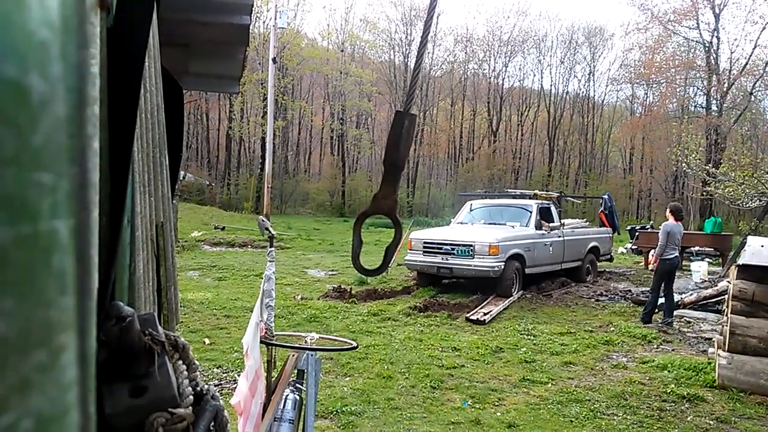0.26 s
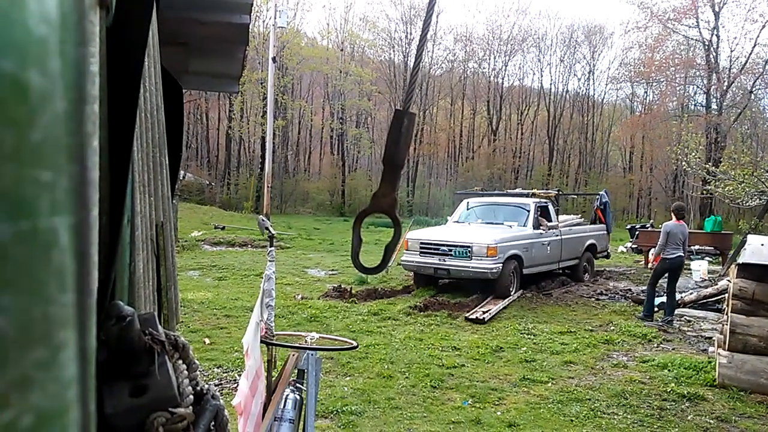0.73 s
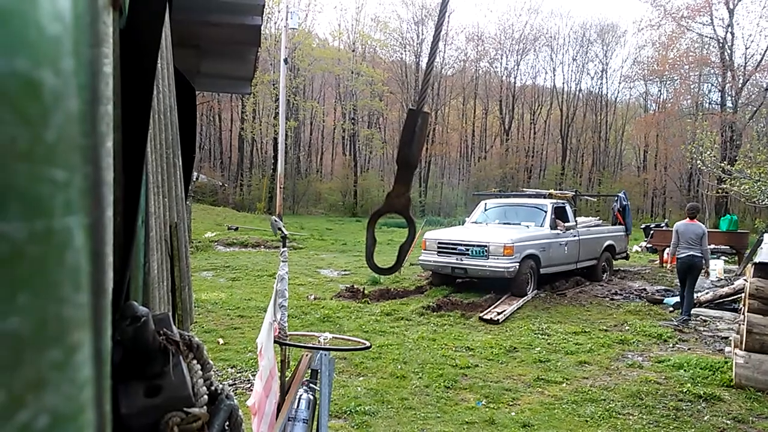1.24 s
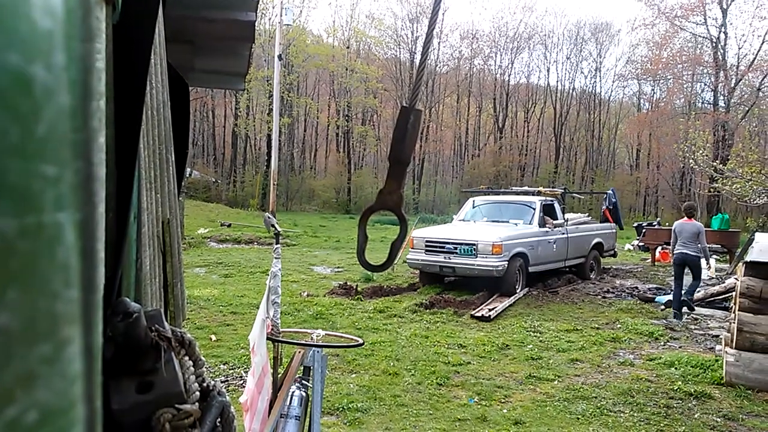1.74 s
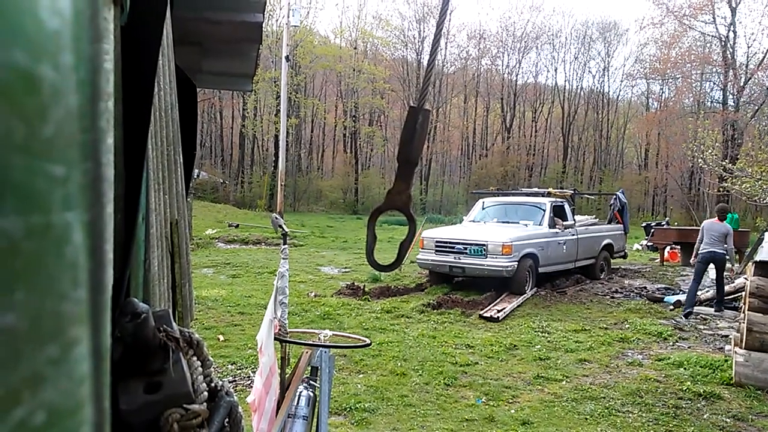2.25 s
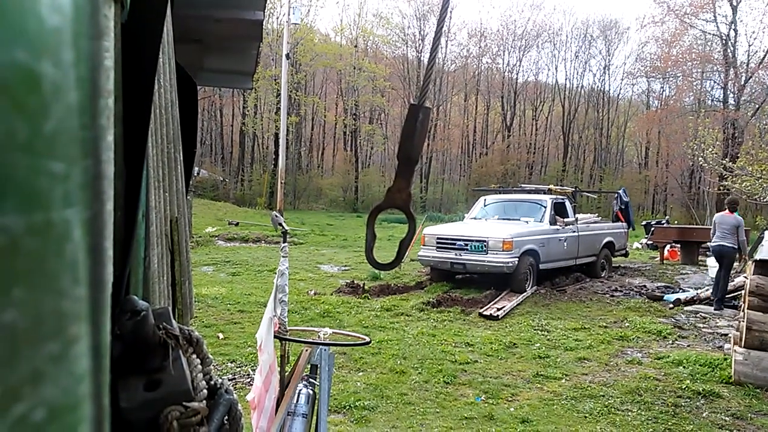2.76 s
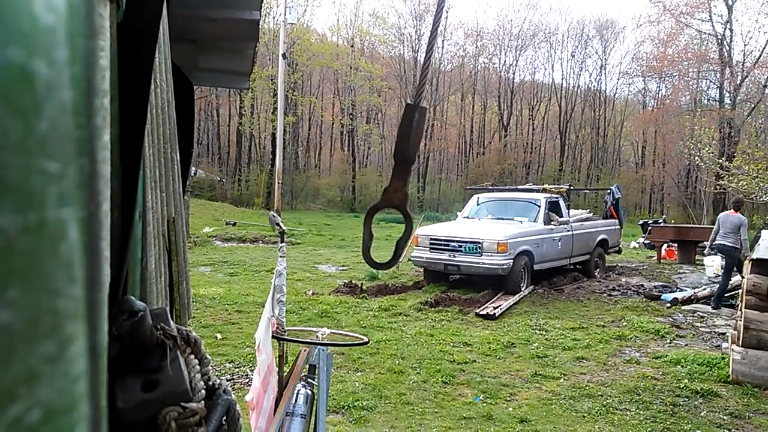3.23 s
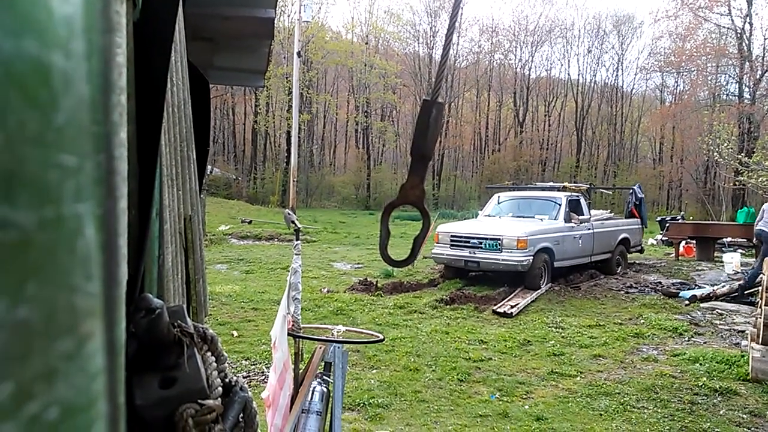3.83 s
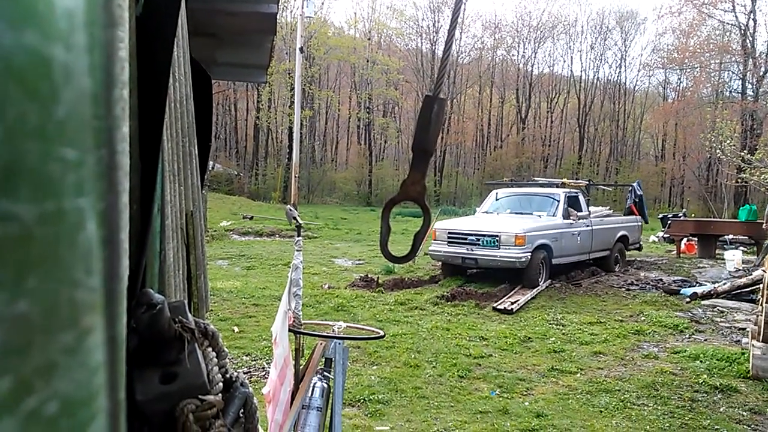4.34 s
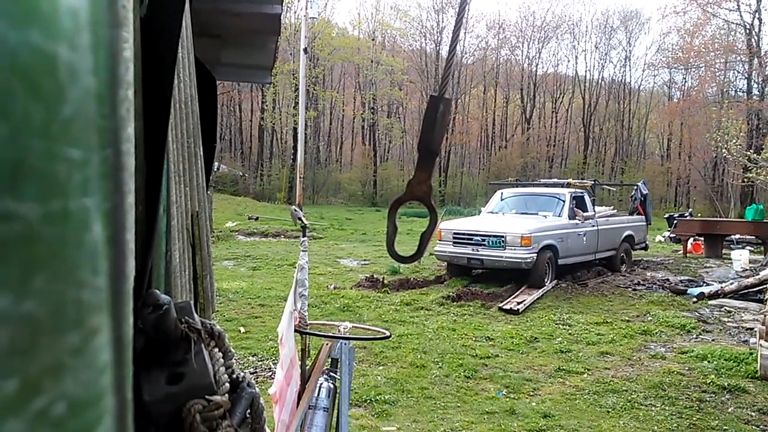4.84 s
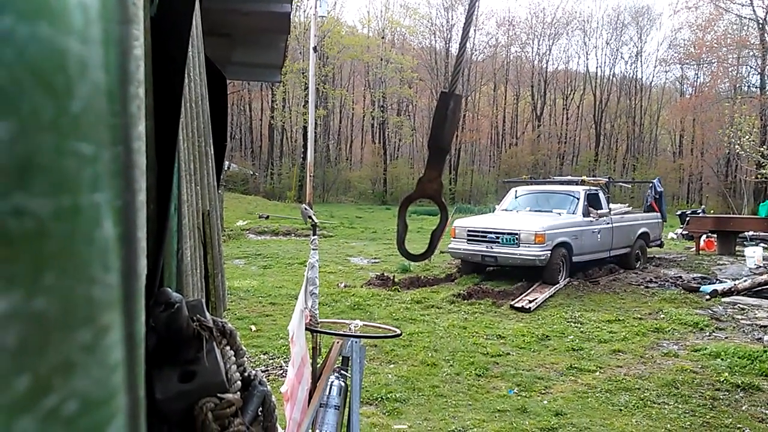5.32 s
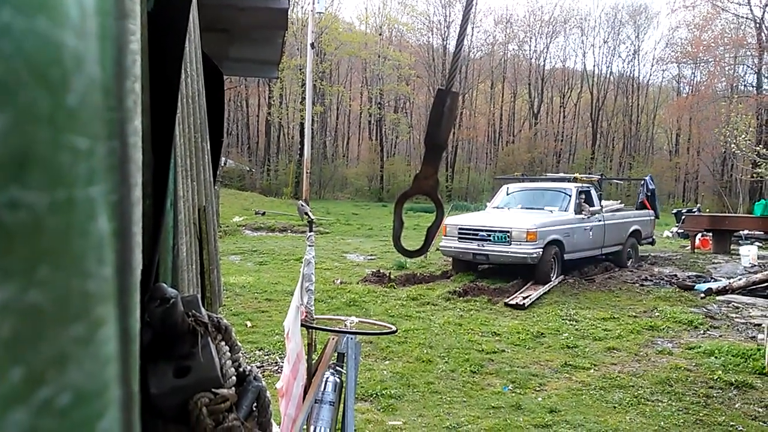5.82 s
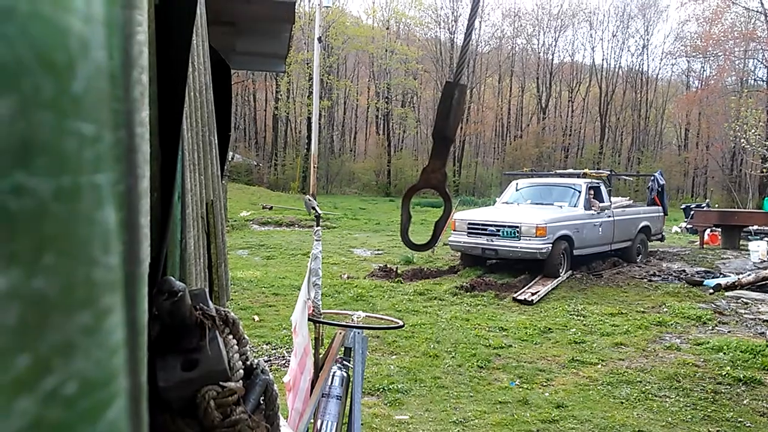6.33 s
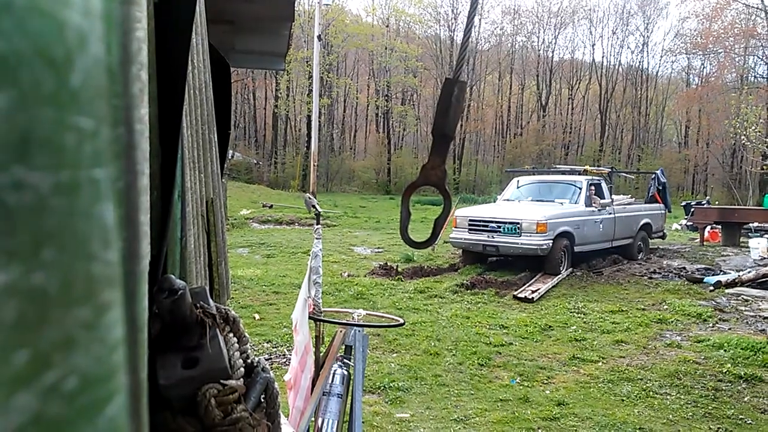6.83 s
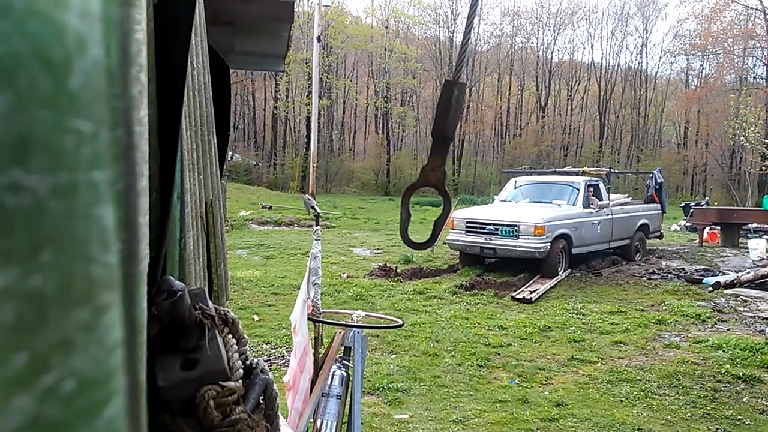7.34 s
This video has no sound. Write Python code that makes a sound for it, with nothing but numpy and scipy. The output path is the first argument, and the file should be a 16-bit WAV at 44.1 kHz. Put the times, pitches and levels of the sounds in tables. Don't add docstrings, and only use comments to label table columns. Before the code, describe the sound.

Outdoors in a muddy, wooded yard, a stuck truck's engine is revved in six short bursts a little over a second apart. The throaty exhaust climbs, peaks, then burbles down, with metallic panel buzz and airy intake rush riding on top. A sharp backfire with a crackling scatter comes about a third of the way in; the last two revs are brightest. A small microphone on a porch captures it loud, thin in deepest bass.

```python
import sys
import numpy as np
from scipy import signal
from scipy.fft import rfft, irfft, next_fast_len
from scipy.io import wavfile
from scipy.ndimage import uniform_filter1d, minimum_filter1d, map_coordinates

SR = 44100
rng = np.random.default_rng(int(sys.argv[2]) if len(sys.argv) > 2 else 0)


def convert_level_to_amplitude(level_db):
    exponent = np.asarray(level_db, float) / 20
    return 10 ** exponent


def output_pcm(signal):
    pcm = np.clip(np.atleast_2d(signal).T, -1, 1) * 32767
    wavfile.write(sys.argv[1], SR, np.round(pcm).astype(np.int16))


N = 333837

# centre in Hz, width in Hz, level in dB.
BARK_MODES = [(249.65, 19.5, 0.5), (314.7, 23.6, 1), (369.5, 15.3, -0.5), (422.4, 14.9, -1),
              (461, 11.8, -3), (507.5, 14.1, -4.5), (578, 66, -16), (727, 44, -12)]
# opening time in seconds, shutting time in seconds.
THROTTLE_TIMES = [
    (.3, 0.99),
    (1.5, 2.18),
    (2.84, 3.47),
    (4.14, 4.72),
    (5.38, 6.23),
    (6.78, 7.33),
]
USUAL_EFFORT_DB = -25
STIR_DB = -39


def exhaust(turns, load):
    # centre in Hz, width in Hz, level in dB.
    thump_modes = [(60.6, 12, 0)]
    # centre in Hz, width in Hz, level in dB.
    boom_modes = [(95, 55, -10.5), (115.1, 13.6, 5)]
    # centre in Hz, width in Hz, level in dB.
    burble_modes = [(154.6, 17, -0.83), (172.6, 30, -1.4), (206.3, 7.5, -1.7)]
    cylinder_strengths = [1, -0.73, -0.1, -1.3, -0.11, -0.21, -1.45, 0.67]

    shaft_hz, four_db, three_db, thump_db, boom_db, burble_db, bark_db = pipe_levels(load)
    angle = 2 * np.pi * turns + .05 * wobble(35)
    order = {k: np.cos(k * angle) for k in (3, 4, 6, 8)}
    flutter = convert_level_to_amplitude((1.5 + 1.7 * load) * wobble(40))

    softened = 1 - .5 * load * np.exp(-((4 * shaft_hz - 115) / 22) ** 2)
    six_db = np.clip(-10 + .8 * (shaft_hz - 48), -14, 0)
    firing_tones = order[4] + convert_level_to_amplitude(six_db) * order[6] + convert_level_to_amplitude(-18.5) * order[8]
    drone = -convert_level_to_amplitude(four_db) * flutter * softened * firing_tones
    drone += convert_level_to_amplitude(three_db + 1.04 * wobble(30)) * order[3]

    count = np.floor(4 * turns).astype(int)
    at = np.flatnonzero(np.diff(count))
    luck = rng.standard_normal((2000, 3))[:len(at)]
    chance = .9 * luck[:, 0] * convert_level_to_amplitude(1.5 * luck[:, 1])
    size = 1.1 + .9 * np.take(cylinder_strengths, count[at] % 8) + chance
    late = (0.00048 * SR * np.abs(luck[:, 2])).astype(int)
    firings = np.bincount(at + late, size / np.sqrt(shaft_hz[at]), N + SR)[:N]
    firings = unit(firings) + .5 * rng.standard_normal(N)

    thump = ringing(firings, thump_modes, 56, 93)
    boom = ringing(firings, boom_modes, 86, 166)
    burble = ringing(firings, burble_modes, 145, 316)
    bark = ringing(firings + rng.standard_normal(N), BARK_MODES, 147, 1050)
    sound = np.sqrt(2) * drone
    sound += convert_level_to_amplitude(thump_db + 3.5) * thump
    sound += convert_level_to_amplitude(boom_db - 7.5 + 7 * load) * boom
    sound += convert_level_to_amplitude(burble_db - 1.5) * burble
    sound += convert_level_to_amplitude(bark_db - 0.36) * bark
    return sound


def ringing(x, table, low_hz, top_hz):
    def response(hz):
        low_side = (1j * hz / (low_hz + 1j * hz)) ** 2
        return modes(table, hz) * low_side / (1 + 1j * hz / top_hz) ** 2
    return unit(filtered(x, response))


def pipe_levels(load):
    # dB added to order 4 pulling, to its loss with the throttle shut, and to order 3.
    push = [(0, -3, -3), (0, -5, -3), (-3, -3, 3), (-2, 0, 1), (-1, -1, -1), (1, -16, -5), (1, -14, -6),
            (0, 0, 0)]
    # frequency in Hz, level in dB.
    pulling = [(70, -11), (85, -16), (115, -11), (140, -22), (165, -16), (203, -9), (220, -22), (250, -26)]
    # frequency in Hz, level in dB.
    shut_loss = [(70, -16), (140, -12), (160, -1)]
    # frequency in Hz, level in dB.
    overrun = [(55, -28), (88, -28), (102, -15), (121, -7), (134, -28), (180, -38)]
    # shaft speed in Hz, level in dB.
    thumping = [(17, -25), (33, -24), (39, -30), (46, -26), (51, -37), (62, -39)]
    # shaft speed in Hz, level in dB.
    burbling = [(17, -7), (24, -1), (34, -4), (41, 0), (49, 0), (52, -12), (62, -10)]
    # time in seconds, peak in dB, length in
    # seconds.
    thump_surges = [(0, -11, .05), (.17, -15, .06), (.41, -11, .045), (.76, -13, .1), (1.2, -18, .1),
                    (1.85, -16, .09), (2.08, -8, .06), (2.44, -17, .12), (2.9, -19, .06), (3.15, -18, .15),
                    (3.38, -11, .07), (3.85, -14, .17), (4.36, -14, .12), (4.72, -14, .11), (5.12, -16, .1),
                    (5.42, -16, .07), (5.7, -19, .15), (5.95, -18, .06), (6.32, -8, .09), (6.52, -17, .12),
                    (7.07, -17, .12), (7.38, -13, .06)]
    # time in seconds, peak in dB, length in seconds.
    boom_surges = [(.03, -14, .06), (.17, -11, .06), (.71, -11, .09), (1.2, -12, .1), (1.41, -12, .05),
                   (1.84, -9, .1), (2.25, -8, .06), (2.43, -1, .12), (2.75, -17, .05), (3.07, -7, .13),
                   (3.48, -6, .04), (3.7, -10, .15), (4.1, -18, .07), (4.43, -9, .15), (4.92, -14, .08),
                   (5.43, -4, .07), (5.58, -14, .05), (5.8, -15, .12), (6.23, -13, .04), (6.4, -5, .08),
                   (6.62, -12, .12), (7.0, -16, .1), (7.4, -11, .05), (7.56, -3, .06)]
    # time in seconds, peak in dB, length in seconds.
    bark_surges = [(.03, -24, .08), (.17, -28, .05), (.93, -16, .11), (1.25, -26, .05), (2.22, -19, .08),
                   (3.5, -20, .08), (4.5, -20, .06), (4.9, -17, .1), (6.08, -13, .08), (6.58, -18, .12),
                   (7.4, -15, .07)]

    shaft_hz, blip = shaft()
    pull_db, shut_db, coast_db = uniform_filter1d(np.array(push, float)[blip].T, size=4000, axis=1)
    drawn_db = uniform_filter1d(effort(STIR_DB), size=5000) - USUAL_EFFORT_DB
    four_hz, three_hz = 4 * shaft_hz, 3 * shaft_hz

    four_db = along(pulling, four_hz) + pull_db + 2 * wobble(9)
    four_db += (along(shut_loss, four_hz) + shut_db) * (1 - load)
    held_load = np.maximum(load, np.roll(load, round(.14 * SR)))
    three_db = along(overrun, three_hz) + coast_db + 2 * wobble(9) - 14 * held_load
    steady_db = along(thumping, shaft_hz)
    thump_db = surging(steady_db, thump_surges)
    boom_db = surging(steady_db, boom_surges)
    burble_db = -18 + .36 * drawn_db + along(burbling, shaft_hz)
    bark_db = surging(-22.5 + .45 * drawn_db + .3 * (shaft_hz - 33), bark_surges)
    return shaft_hz, four_db, three_db, thump_db, boom_db, burble_db, bark_db


def shaft():
    # slowest time and fastest time in seconds, then slowest, fastest and coasting
    # speed in Hz.
    revs = [
        (-1, -.3, 20, 42, 38.5),
        (.34, .91, 17, 38.6, 37),
        (1.53, 2.21, 19, 45.5, 40.5),
        (2.92, 3.46, 20.6, 40.7, 39),
        (4.26, 4.76, 20.2, 40, 38.6),
        (5.52, 6.21, 30.5, 62, 41),
        (6.9, 7.33, 33.3, 51.5, 39.5),
        (8, 8.5, 36, 40, 38),
    ]
    # lateness of the climb (power), its rounding from 0 to 1, drop to coasting in
    # seconds, steepening of the sag (power).
    shapes = [(1, .5, .15, 1.7), (1.5, .55, .2, 1.5), (1.1, .55, .2, 1.45), (1.05, .55, .2, 1.6),
              (1.12, .55, .15, .9), (1.05, .05, .05, 1.2), (.97, .95, .05, 1.2), (1, .5, .1, 1)]
    t = np.arange(N) / SR
    low_s, top_s, low_hz, top_hz, coast_hz = np.transpose(revs)
    k = np.searchsorted(low_s, t) - 1
    bend, ease, settle_s, steepen = np.array(shapes)[k].T
    u = np.clip((t - low_s[k]) / (top_s - low_s)[k], 0, 1) ** bend
    climb = u + ease * (u * u * (3 - 2 * u) - u)
    settle = np.clip((t - top_s[k]) / settle_s, 0, 1)
    sag_s = low_s[k + 1] - top_s[k] - settle_s
    sag = np.clip((t - top_s[k] - settle_s) / sag_s, 0, 1) ** steepen
    speed_hz = low_hz[k] + climb * (top_hz - low_hz)[k]
    speed_hz += settle * (coast_hz - top_hz)[k] + sag * (low_hz[k + 1] - coast_hz[k])
    return speed_hz, k


def pedal():
    t = np.arange(N) / SR
    down = sum((t > opened) & (t < shut) for opened, shut in THROTTLE_TIMES)
    return .07 + .88 * uniform_filter1d(1. * down, size=3000)


def effort(stir_db):
    # wide-open time and lift time in seconds, roar wide open in dB, roar at the lift
    # in dB, fade in dB per second.
    draws = [
        (-1, -.3, -30, -23, 18),
        (.36, .88, -31, -23, 23),
        (1.63, 2.07, -30, -18, 24),
        (2.96, 3.35, -30, -18, 26),
        (4.31, 4.68, -29, -17.5, 29),
        (5.6, 6.19, -19, -13.5, 17),
        (6.84, 7.27, -24, -14.5, 14),
    ]
    cracks = [-2] + [opened for opened, _ in THROTTLE_TIMES]
    knots = []
    for (wide, lift, start_db, peak_db, fade), cracked in zip(draws, cracks):
        if knots:
            faded_db = knots[-1][1] - fading * (cracked - knots[-1][0])
            stirred_db = max(stir_db, faded_db)
            knots += [(cracked, faded_db), (cracked + .015, stirred_db)]
            knots += [(cracked + .6 * (wide - cracked), stirred_db + .3 * (start_db - stirred_db))]
        knots += [(wide, start_db), (lift, peak_db), (lift + .08, peak_db - 8)]
        fading = fade
    return curves(knots + [(knots[-1][0] + 1, knots[-1][1] - fading)])[0]


def surging(steady_db, surges):
    t = np.arange(N) / SR
    power = convert_level_to_amplitude(steady_db) ** 2
    for s, db, length in surges:
        power = power + convert_level_to_amplitude(db) ** 2 * np.exp(-2 * ((t - s) / length) ** 2)
    return 10 * np.log10(power)


def engine_bay(turns, load):
    # centre in Hz, width in Hz, level in dB.
    loaded_panels = [(1031, 40, 1), (1299, 148, 1), (1845, 27, 3), (2140, 26, -4), (2420, 79, 0),
                     (2866, 107, 0), (3350, 52, 3.5), (3790, 45, 4.5), (4050, 95, -5), (4670, 164, 2.5)]
    # centre in Hz, width in Hz, level in dB.
    coasting_panels = [(971, 51, 4), (1280, 165, -2), (1856, 316, -2), (2364, 170, 2), (2890, 350, -4),
                       (4250, 230, -4.5), (4810, 590, -9.5)]
    # frequency in Hz, level in dB per Hz.
    roar_colour = [(350, -12), (600, -1), (711, 1.5), (1160, -13), (1370, -6.5), (1640, -10), (4120, -8.5),
                   (9000, -24), (11700, -76), (19800, -120)]
    # frequency in Hz, level in dB per Hz.
    hiss_colour = [(1500, -50), (3000, -10.5), (4400, -10.5), (5300, 2), (6000, -4.5), (6900, -8.5),
                   (8000, -5.5), (10000, -12.5), (12500, -21.5), (15700, -27.5), (20000, -43)]
    # time in seconds, peak in dB, length in seconds.
    flares = [(.4, -27, .04), (1.5, -37, .03), (1.65, -23, .04), (1.95, -21, .08), (2.55, -28, .04),
              (2.8, -38, .04), (2.94, -28, .03), (4.18, -34, .04), (4.32, -23, .05), (5.5, -27, .06),
              (5.63, -18, .04), (6.14, -12, .06), (6.33, -16, .025), (6.85, -21, .04), (6.98, -19, .05)]

    hiss_db = -34.5 + .66 * (effort(-99) - USUAL_EFFORT_DB)
    roar_db = surging(effort(STIR_DB), flares)
    beat = 1 + .3 * load * np.cos(2 * np.pi * 4 * turns)

    def pulling_response(hz):
        return convert_level_to_amplitude(along(roar_colour, hz)) * (.6 + np.abs(modes(loaded_panels, hz)))

    def coasting_response(hz):
        return .06 * convert_level_to_amplitude(along(roar_colour, hz)) + modes(coasting_panels, hz)

    pulling = unit(filtered(patchy(depth_db=2.1), pulling_response))
    coasting = unit(filtered(patchy(depth_db=2.5), coasting_response))
    roar = beat * (np.sqrt(load) * pulling + np.sqrt(1 - load) * coasting)
    hiss = unit(filtered(patchy(depth_db=2.5), lambda hz: convert_level_to_amplitude(along(hiss_colour, hz))))
    roar = convert_level_to_amplitude(roar_db - 2.02 + 0.47 * wobble(17)) * roar
    return roar + convert_level_to_amplitude(hiss_db + 2.5 + 1.13 * wobble(19)) * np.sqrt(beat) * hiss


def singing():
    # start in seconds, length in seconds, pitch in Hz, level in dB.
    sung_notes = [(.3, 0.058, 5500, -39), (0.618, 0.28, 3855, -35), (1.548, 0.17, 1306, -36.5),
                  (1.76, 0.1066, 2436, -38), (1.894, 0.1981, 3877, -30.5), (2.869, 0.25, 1320, -37.5),
                  (2.908, 0.17, 3755, -33.5), (3.102, 0.22, 2554, -33), (4.25, 0.14, 1290, -38),
                  (4.43, .33, 3856, -31.5), (4.522, 0.2, 4674, -33), (5.41, 0.11, 2870, -39),
                  (5.83, 0.24, 3957, -34), (5.978, .26, 4216, -28.5), (6.3, 0.21, 370, -21),
                  (6.477, 0.23, 329.1, -22), (6.079, 0.062, 3376, -23), (7.129, 0.195, 4100, -27),
                  (7.141, 0.1768, 1465, -26.5)]
    out = np.zeros(N)
    for s, length, hz, db in sung_notes:
        t = np.arange(round(length * SR)) / SR
        knots = rng.standard_normal((3, 200))
        fuzz_rate = min(300, hz / 7)
        along_phase = map_coordinates(knots[0], [t * fuzz_rate])
        across_phase = map_coordinates(knots[1], [t * fuzz_rate])
        spurt_db = 2.5 * map_coordinates(knots[2], [t * 45])
        spurts = convert_level_to_amplitude(db + 1.5 + spurt_db) * np.sin(np.pi * t / length) ** 0.29
        angle = 2 * np.pi * hz * t
        tone = along_phase * np.sin(angle) + across_phase * np.cos(angle)
        out[round(s * SR):][:len(t)] += spurts * tone
    return out


def gulps():
    # time in seconds, peak in dB, length in seconds.
    gulp_times = [(0.3127, -23, 0.04), (0.3868, -14, 0.047), (1.638, -17, 0.035), (1.68, -15, .04),
                  (2.977, -17, 0.026), (4.305, -12.5, 0.06), (5.47, -21, .09), (5.6052, -11.5, 0.036),
                  (5.743, -12, 0.042), (6.13, -15, .07), (6.318, -12, 0.042), (6.8283, -10, 0.055),
                  (6.9796, -13, 0.039)]
    # frequency in Hz, level in dB per Hz.
    gulp_colour = [(800, -20), (2500, -3), (5400, 1), (6900, -2), (8200, 2.5), (11000, -14), (15700, -19),
                   (20000, -30)]
    t = np.arange(N) / SR
    rush = np.zeros(N)
    for s, db, length in gulp_times:
        u = np.clip((t - s + 0.012) / length, 0, None)
        rush += convert_level_to_amplitude(db - 9.5) * (1 - np.exp(-9 * u)) * np.exp(-u * u)
    return rush * unit(filtered(rng.standard_normal(N), lambda hz: convert_level_to_amplitude(along(gulp_colour, hz))))


def pops():
    # time in seconds, peak in dB.
    pop_times = [
        (0.121, -13),
        (2.529, -2),
        (2.877, -19),
        (5.347, -26),
    ]
    u = np.arange(600) / (0.00088 * SR)
    blast = np.zeros(N + SR)
    for s, db in pop_times:
        blast[round(s * SR):][:600] += convert_level_to_amplitude(db + 12) * u * (u - 1.3) * np.exp(-u)
    answer = convert_level_to_amplitude(28) * yard(np.gradient(blast))
    pipe_ring = convert_level_to_amplitude(10.5) * filtered(blast, lambda hz: modes(BARK_MODES[2:], hz))
    return filtered(blast[:N] + answer + pipe_ring, lambda hz: 1 / (1 + 1j * hz / 3500) ** 3)


def yard(x):
    # frequency in Hz, time to fade by 60 dB in seconds.
    fade_times = [(200, 0.084), (1000, 0.082), (3000, 0.38), (8000, 0.2)]
    hz, t, z = signal.stft(rng.standard_normal(SR // 2), SR, nperseg=256)
    fading = convert_level_to_amplitude(-60 * t / along(fade_times, hz)[:, None])
    tail = signal.istft(z * fading, SR, nperseg=256)[1]
    return signal.fftconvolve(np.pad(x, (220, 0)), tail / np.linalg.norm(tail))[:N]


def unit(x):
    return x / np.sqrt(np.mean(x ** 2) + 1e-20)


def along(points, hz):
    f, v = np.transpose(points)
    return np.interp(np.log(hz + 1), np.log(f + 1), v)


def curves(rows):
    s, *cols = np.transpose(rows)
    return [np.interp(np.arange(N) / SR, s, c) for c in cols]


def wobble(rate):
    return map_coordinates(rng.standard_normal(1000), [np.arange(N) * rate / SR])


def filtered(x, response):
    m = next_fast_len(N + SR // 2)
    return irfft(rfft(x, m) * response(np.fft.rfftfreq(m, 1 / SR)), m)[:N]


def modes(table, hz):
    total = 0
    for k, (c, w, db) in enumerate(table):
        total = total + (-1) ** k * convert_level_to_amplitude(db) * 1j * hz * w / (c * c - hz * hz + 1j * hz * w)
    return total


def patchy(depth_db):
    z = signal.stft(rng.standard_normal(N), nperseg=512)[2]
    field = uniform_filter1d(rng.standard_normal(z.shape), size=3, axis=0)
    field = uniform_filter1d(field, size=9, axis=1)
    return signal.istft(z * convert_level_to_amplitude(depth_db * unit(field)), nperseg=512)[1][:N]


def scene():
    turns = np.cumsum(shaft()[0]) / SR
    load = pedal()
    truck = exhaust(turns, load) + engine_bay(turns, load) + singing() + gulps() + pops()
    return truck[None]


def roll_off(x):
    return signal.sosfilt(signal.butter(12, 15760, fs=SR, output="sos"), x)


def record(dry):
    x = filtered(dry[0], lambda hz: (1j * hz / (30 + 1j * hz)) ** 3)
    needed = np.minimum(1, .96 / (np.abs(x) + 1e-9))
    gain = uniform_filter1d(minimum_filter1d(needed, size=261), size=131)
    gain *= np.clip((N - np.arange(N)) / (.004 * SR), 0, 1)
    return roll_off((x * gain)[None])


dry = scene()
out = record(dry)
output_pcm(out)
```